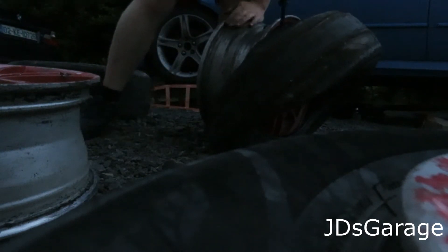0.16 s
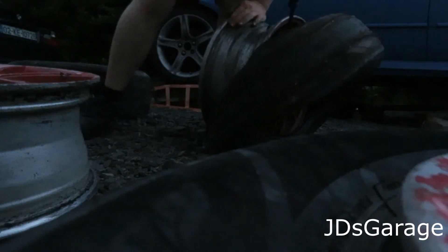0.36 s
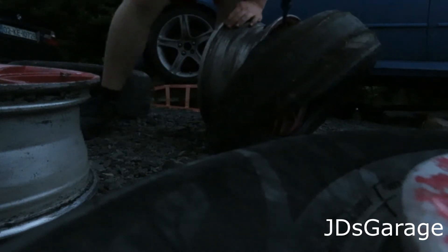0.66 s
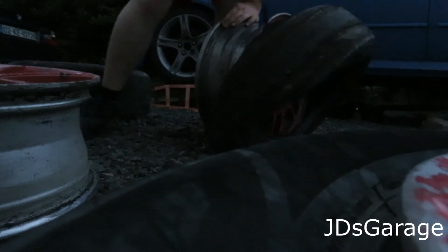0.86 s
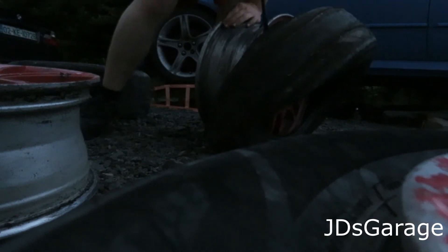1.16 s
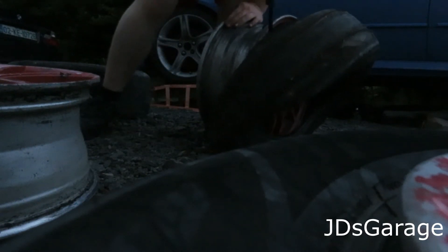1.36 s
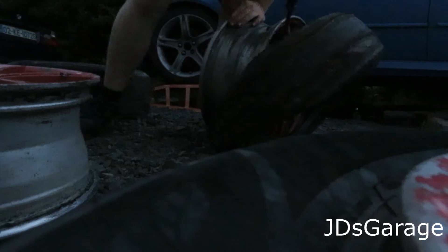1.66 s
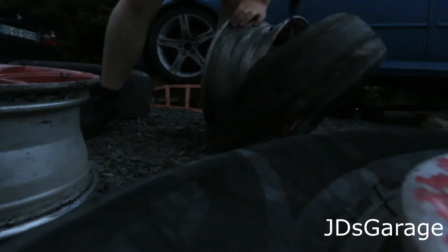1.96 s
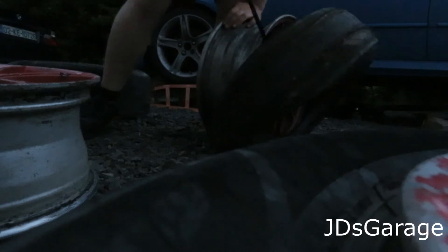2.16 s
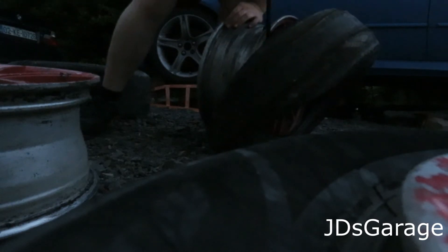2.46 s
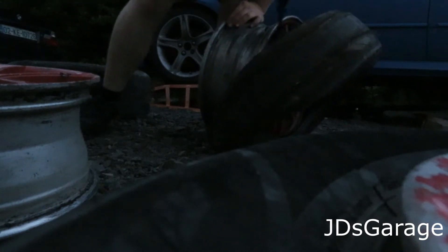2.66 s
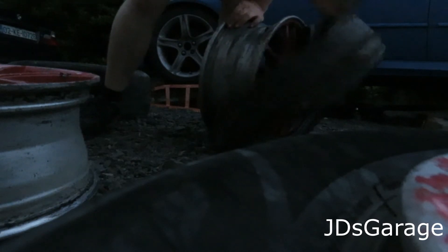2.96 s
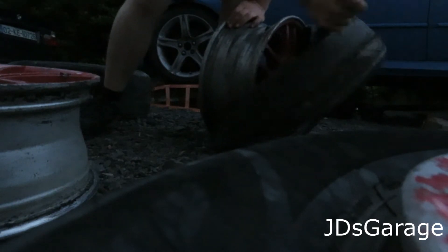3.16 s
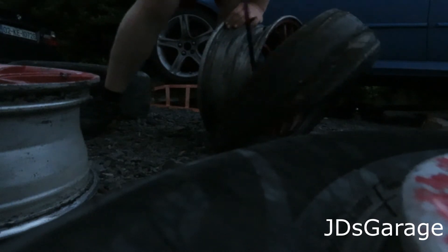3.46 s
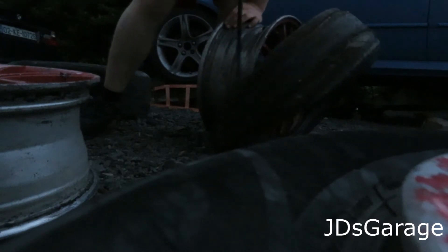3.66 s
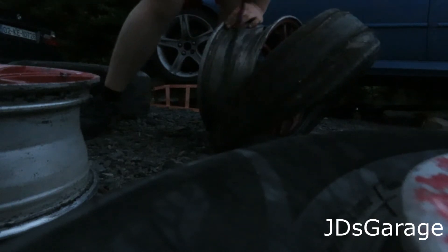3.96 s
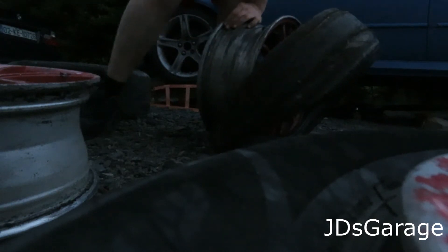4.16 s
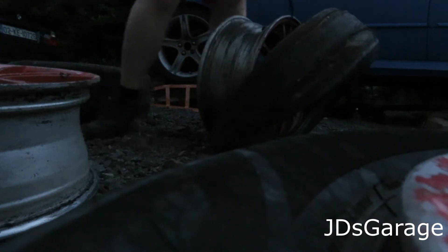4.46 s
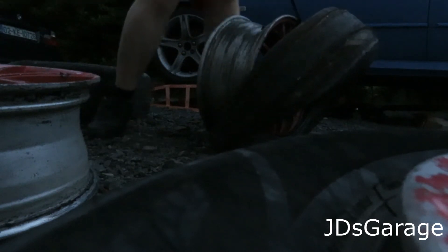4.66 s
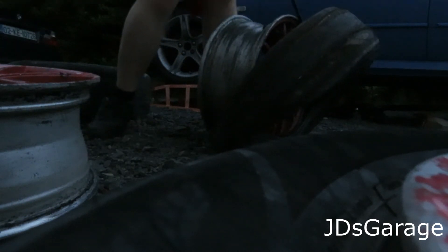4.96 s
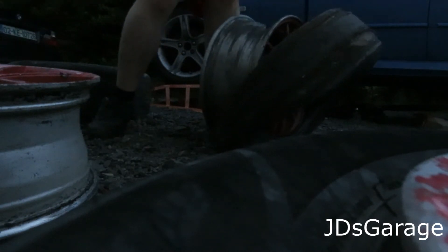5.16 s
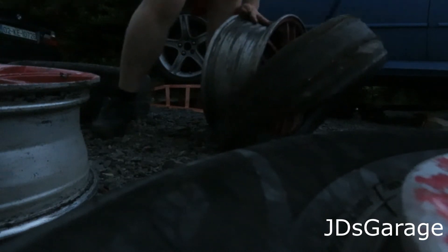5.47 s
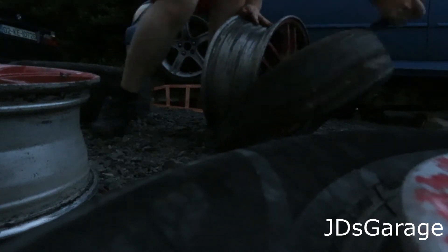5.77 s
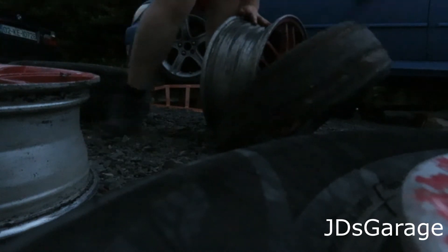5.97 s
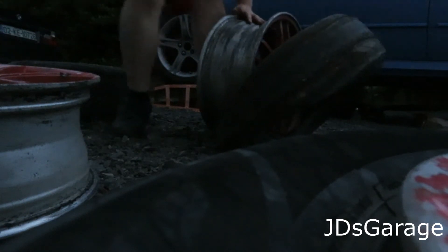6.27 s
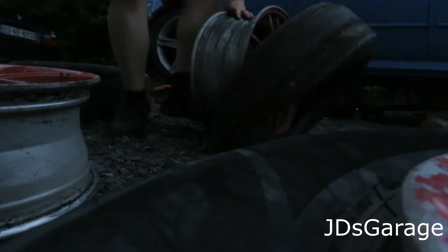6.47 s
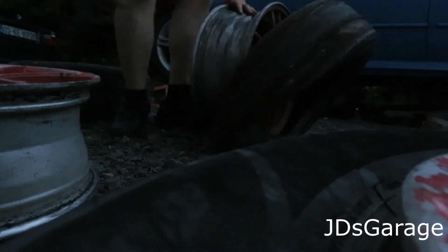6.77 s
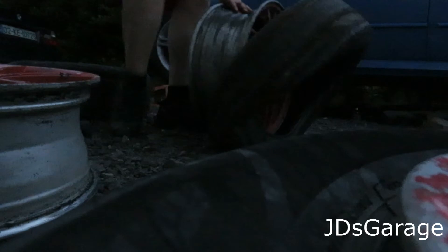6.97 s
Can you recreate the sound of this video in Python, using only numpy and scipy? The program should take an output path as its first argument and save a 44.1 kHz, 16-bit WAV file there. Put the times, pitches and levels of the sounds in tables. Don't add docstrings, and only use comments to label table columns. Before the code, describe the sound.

Irregular hard metal knocks and scrapes on a rim, damped by rubber, with creaking tyre, a few squeaks and shoes grinding gravel.

```python
import sys
import numpy as np
from scipy import signal
from scipy.fft import rfft, irfft
from scipy.io import wavfile
from scipy.ndimage import uniform_filter1d

SR = 44100
rng = np.random.default_rng(int(sys.argv[2]) if len(sys.argv) > 2 else 0)


def dump(signal):
    limited = np.clip(np.atleast_2d(signal).T, -1, 1)
    pcm = np.round(limited * 32767).astype(np.int16)
    wavfile.write(sys.argv[1], SR, pcm)


def natural_amplitude(level_db):
    exponent = np.asarray(level_db, float) / 20
    return 10 ** exponent


N = 313992


def rms_one(x):
    return x / np.sqrt(np.mean(x ** 2) + 1e-20)


def in_time(rows):
    s, *columns = np.transpose(rows)
    return [np.interp(np.arange(N) / SR, s, column) for column in columns]


def band(x, low_hz, high_hz):
    return signal.sosfilt(signal.butter(2, [low_hz, high_hz], "band", fs=SR, output="sos"), x)


def shaped(x, spectrum):
    hz, level_db = np.transpose(spectrum)
    bins_hz = np.fft.rfftfreq(N, 1 / SR) + 1
    gain_db = np.interp(np.log(bins_hz), np.log(hz + 1), level_db)
    return irfft(rfft(x) * natural_amplitude(gain_db), N)


def drift(rate_hz):
    knots_per_s = 60
    knots = rng.standard_normal(int(N / SR * knots_per_s) + 2)
    knots = uniform_filter1d(knots, max(1, round(knots_per_s / rate_hz)))
    return rms_one(np.interp(np.arange(N) / SR, np.arange(len(knots)) / knots_per_s, knots))


def grains(per_s, spread_db):
    sizes = natural_amplitude(spread_db * np.minimum(rng.exponential(1, N), 4)) * rng.choice([-1, 1], N)
    return sizes * (rng.random(N) < per_s / SR) + 1e-18


def body(clicks, modes, damping, low_db=0, wander_db=4.5):
    out = np.zeros(N)
    for hz, level_db, t60 in modes:
        r = natural_amplitude(-60 / (t60 * damping * SR))
        w = 2 * np.pi * hz / SR
        gain = natural_amplitude(level_db) * np.sqrt(1 - r * r) * np.sin(w)
        share = natural_amplitude(wander_db * drift(30) + low_db * (hz < 1500))
        out += signal.lfilter([0, gain], [1, -2 * r * np.cos(w), r * r], clicks * share)
    return out


def add(out, sound, s):
    at = round(s * SR)
    out[at:at + len(sound)] += sound[:N - at]


def strokes(tables):
    gate = np.zeros(N)
    for rows in tables:
        gate[round(rows[0][0] * SR):round(rows[-1][0] * SR)] = 1
    return uniform_filter1d(gate, size=200)


def swells(rows, rise_db, fall_db):
    t, gain, other = np.arange(N) / SR, np.full(N, 1e-9), np.zeros(N)
    for start_s, top_s, end_s, level_db, other_db in rows:
        span = slice(round(start_s * SR), round(end_s * SR))
        bend_db = np.interp(t[span], [start_s, top_s, end_s], [-rise_db, 0, -fall_db])
        shape = natural_amplitude(level_db + bend_db)
        gain[span] += shape
        other[span] += shape * other_db
    return uniform_filter1d(gain, size=80), uniform_filter1d(other / gain, size=200)


# (frequency [Hz], level [dB per Hz])
GRIT_SPECTRUM = [(1470, -30), (2500, 0.5), (2940, -5), (3330, -1), (6980, -10.5), (9740, -14), (13000, -24),
                 (15800, -42)]
# (time [s], level [dB])
LOAD = [(0.0, -61), (0.52, -44), (0.69, -60), (1.41, -59), (1.9, -39.5), (2.2, -41), (2.34, -50),
        (3.01, -44.5), (3.53, -48.5), (4.0, -66), (4.56, -45.5), (4.84, -54), (5.27, -42), (5.67, -52.5),
        (5.85, -52.5), (6.23, -50), (6.54, -43), (7.12, -49)]


def rustle():
    stones = grains(5000 * natural_amplitude(2.5 * drift(50)), spread_db=0.5)
    dull = natural_amplitude(-1.5) * rms_one(band(stones, 800, 3200))
    colours = dull + rms_one(shaped(stones, GRIT_SPECTRUM))
    return natural_amplitude(-45 + 0.27 * in_time(LOAD)[0]) * colours


# (frequency [Hz], level [dB])
AIR_SPECTRUM = [(12, -54.5), (20, -26.5), (126, -8.5), (221, 5.5), (284, -1), (444, 1), (525, -1.5),
                (621, -22), (755, -4), (2180, -12.5), (2580, -16.5), (3320, -20.5), (11700, -49),
                (13400, -51.5), (15800, -80.5)]


def ambience(work):
    knee_db, slope, recovery_db_per_s = -28, 0.27, 3.5
    level_db = 10 * np.log10(uniform_filter1d(work ** 2, size=256) + 1e-12)
    ramp = recovery_db_per_s * np.arange(N) / SR
    cut_db = np.maximum.accumulate(slope * np.maximum(level_db - knee_db, 0) + ramp) - ramp
    common, own = rng.standard_normal(N), rng.standard_normal((2, N))
    air = natural_amplitude(-53.5 + 1.5 + 2.0 * drift(4)) * rms_one(shaped(common + 0.15 * own, AIR_SPECTRUM))
    return natural_amplitude(-cut_db) * (air + rustle())


# (delay [s], level [dB])
ECHOES = [(.0011, -16), (.0017, -15.5), (.0062, -13.5), (.0091, -18),
          (.021, -20), (.028, -21), (.047, -26.5), (.056, -29)]


def yard(x):
    dull, out = signal.lfilter([.4], [1, -.6], x), np.zeros((2, N))
    for k, (lag_s, echo_db) in enumerate(ECHOES):
        add(out[k % 2], natural_amplitude(echo_db) * dull, lag_s)
    return out


# (start [s], hardest [s], end [s], crunch level [dB], fine grit against crunch [dB])
SCUFFS = [(4.22, 4.24, 4.31, -48, -19), (4.29, 4.364, 4.45, -46, -8), (4.465, 4.515, 4.65, -36.5, -13.5),
          (4.84, 4.89, 4.93, -46, -14), (4.92, 4.96, 5.04, -54, -3), (5.5, 5.598, 5.7, -41.5, -8),
          (5.8, 5.845, 5.89, -54, 0), (6.03, 6.065, 6.1, -42, -10), (6.06, 6.102, 6.15, -40, -11),
          (6.128, 6.144, 6.19, -38, -15), (6.15, 6.185, 6.26, -42, -13), (6.2, 6.27, 6.34, -54, -4),
          (6.65, 6.684, 6.76, -43, -13), (6.926, 6.938, 7.0, -34, -5.5), (7.002, 7.009, 7.04, -40, 4),
          (7.008, 7.02, 7.06, -40, 4), (7.025, 7.037, 7.07, -43, 2), (7.095, 7.101, 7.13, -39, -3),
          (7.105, 7.119, 7.13, -38, -4)]


def gravel():
    tread, grit_db = swells(SCUFFS, rise_db=15, fall_db=22)
    stones = grains(2200 * natural_amplitude(5 * drift(50)), spread_db=3.5)
    crunch = rms_one(band(band(stones, 290, 1900), 200, 2200))
    return tread * (crunch + natural_amplitude(grit_db + 4.5) * rms_one(shaped(stones, GRIT_SPECTRUM)))


# (time [s], pitch [Hz], level [dB])
SQUEAKS = [
    [(1.14, 1203, -61), (1.17, 1148, -49), (1.215, 1060, -63.5), (1.275, 919.4, -45), (1.305, 798, -45)],
    [(2.215, 930, -36), (2.26, 1016, -36), (2.285, 1250, -38), (2.31, 1420, -42), (2.335, 1443, -55)],
    [(6.73, 2753, -59), (6.76, 2700, -47), (6.83, 2600, -54), (6.92, 2424, -50), (6.93, 2400, -67)],
]


def squeaks():
    rough, width_hz = .03, 110
    hz, level_db = in_time(np.concatenate(SQUEAKS))
    turn = 2 * np.pi * np.cumsum(hz * (1 + rough * drift(30))) / SR
    grain = rms_one(signal.lfilter(*signal.butter(1, width_hz, fs=SR), rng.standard_normal((2, N))))
    tone = (0.49 + grain[0]) * np.sin(turn) + grain[1] * np.cos(turn)
    return strokes(SQUEAKS) * natural_amplitude(level_db - 2.5 + 3 * drift(60)) * tone


# (frequency [Hz], level [dB], decay t60 [s])
TYRE_MODES = [(151, -25.5, 0.08), (205, -2.5, 0.27), (242.6, 2, 0.24), (312, -10, 0.2), (385.2, 3, 0.059),
              (433, -2, 0.087), (493.5, -3, 0.16), (697, -10.5, 0.065)]
# (start [s], hardest [s], end [s], creak level [dB], rumble against creak [dB])
HEAVES = [
    (2.25, 2.29, 2.32, -26, -30),
    (2.54, 2.56, 2.6, -30, -20),
    (2.59, 2.62, 2.69, -32, -20),
    (3.0, 3.06, 3.1, -30, -12),
    (4.66, 4.74, 4.78, -33, -30),
    (3.55, 3.571, 3.63, -23, -20),
    (5.125, 5.135, 5.2, -29.5, -33.5),
    (5.44, 5.6, 5.64, -28, -19),
    (5.5, 5.576, 6, -57, -2),
]
# (time [s], peak level [dB], pitch [Hz])
TREAD_BLOWS = [(0.562, 0, 215), (1.311, -23.5, 196), (1.359, -21.5, 200.8), (1.726, -24.5, 223),
               (1.767, -24, 236.2), (1.877, -22, 239), (2.392, -26, 184), (2.531, -15, 192.3),
               (2.628, -17, 197.4), (1.385, -31, 200), (1.668, -33, 230), (2.003, -30, 250),
               (2.562, -34, 210), (3.842, -26, 210), (4.604, -31, 220), (4.884, -41, 210),
               (6.319, -33, 210), (7.098, -32, 210), (2.602, -24, 200), (2.662, -32, 200),
               (2.776, -32, 210), (2.862, -36, 245), (2.91, -33, 207), (3.031, -25, 170), (5.324, -30, 250),
               (5.373, -28, 213), (5.468, -21, 240), (5.505, -24, 240), (5.53, -25, 220), (5.548, -23, 210),
               (5.563, -20, 210), (5.588, -24, 220), (5.608, -26, 210), (5.808, -32, 242),
               (5.845, -34, 230), (3.057, -14.5, 196), (3.112, -18.5, 191.5), (4.229, -32.5, 229.6),
               (5.201, -11, 245), (5.444, -22, 235), (6.062, -29, 198.3), (0.996, -37, 210),
               (6.976, -22, 163.5), (7.013, -23.5, 220)]
# (time [s], peak level [dB], pitch [Hz])
WALL_BLOWS = [(0.996, -35, 407), (2.198, -18, 470), (2.344, -30.5, 451), (3.308, -28.5, 468),
              (3.541, -14.5, 465.5), (3.841, -23.5, 506), (4.496, -27.5, 461), (4.601, -26, 453),
              (4.641, -22, 393), (5.129, -18.5, 426), (1.16, -39, 480), (1.182, -39, 490),
              (1.823, -30, 495), (2.075, -28, 404), (2.394, -32, 430), (2.533, -16, 470), (2.56, -33, 520),
              (3.575, -21, 450), (3.655, -32, 480), (3.685, -33, 480), (5.088, -31, 430), (5.15, -25, 420),
              (4.884, -34, 400), (2.776, -36, 430), (3.06, -22, 400), (5.203, -13, 510), (5.203, -20, 377),
              (5.47, -26, 500), (5.505, -28, 480), (5.692, -30, 450), (6.133, -29, 433), (6.143, -30, 520),
              (5.71, -24.5, 490), (5.76, -38, 477), (6.318, -27, 370), (6.672, -29, 422),
              (6.93, -19.5, 309)]


def carcass():
    load_db = in_time(LOAD)[0]
    wrench, rumble_db = swells(HEAVES, rise_db=1.5, fall_db=11)
    force = natural_amplitude(load_db - 5) + wrench * natural_amplitude(-12.5)
    slips = rms_one(grains(1000 * natural_amplitude(3 * drift(30)), spread_db=2.5)) * force
    for s, peak_db, hz in TREAD_BLOWS + WALL_BLOWS:
        slips[round(s * SR)] += natural_amplitude(peak_db + 4)
    rumble_gain = wrench * natural_amplitude(rumble_db - 4) + natural_amplitude(-46.5 + .35 * load_db + 3 * drift(5))
    rumble = rumble_gain * rms_one(band(rng.standard_normal(N), 29, 100))
    return band(body(slips, TYRE_MODES, damping=0.76), 140, 700) + rumble


# (time [s], level [dB])
DROPS = [
    (3.056, -32),
    (3.541, -38.5),
    (5.445, -32),
    (6.929, -44),
    (6.976, -44),
    (7.013, -37.5),
]


def thuds():
    out, t = np.zeros(N), np.arange(round(.3 * SR)) / SR
    swell = 1 - np.exp(-t / 0.0046)
    push = np.sin(2 * np.pi * 75 * t) * natural_amplitude(2.5 - 60 * t / 0.21) * swell
    for s, peak_db, hz in TREAD_BLOWS + WALL_BLOWS:
        pair = np.sin(2 * np.pi * hz * t) + .35 * np.sin(2 * np.pi * 1.18 * hz * t)
        add(out, natural_amplitude(-52 + 0.1 * peak_db) * push, s)
        add(out, natural_amplitude(peak_db + 1.0) * pair * natural_amplitude(-60 * t / 0.083) * swell, s)
    for s, drop_db in DROPS:
        add(out, natural_amplitude(drop_db) * push, s)
    return out


# (time [s], frequency [Hz], level [dB], decay t60 [s])
FREE_RINGS = [(.56, 1685, -8.5, 0.1), (.562, 1217, -24, 0.16), (.56, 1175, -12, 0.05),
              (.5575, 3200, 3, .035), (.558, 2530, -10, .04), (.997, 2076, -23, 0.044),
              (1.313, 2070, -20, 0.06), (1.356, 1705, -26, 0.09), (2.2, 965, -23, 0.12),
              (2.202, 790, -21, .12), (2.203, 1650, -22, .12), (2.532, 1700, -19, .08),
              (2.532, 2500, -20, .07), (2.533, 3700, -32, .14), (2.622, 1910, -30, .07),
              (3.842, 791, -19, .07), (3.842, 3316, -18, .12), (4.642, 790, -27, .09),
              (5.203, 1330, -17, .06), (5.203, 797, -17, .06), (2.625, 3680, -33, .06),
              (2.638, 1600, -28, .07), (5.204, 2050, -21, .12), (7.099, 2100, -25, .06),
              (2.2, 2070, -15, 0.085), (2.532, 2070, -14.5, 0.058), (2.63, 1653, -23.5, 0.045),
              (3.543, 3680, -22, 0.2), (3.543, 2690, -12, 0.054), (3.605, 2033, -17, 0.11),
              (3.842, 2062, -20, 0.1), (3.842, 1305, -19, .1), (3.842, 4990, -11, .06),
              (4.606, 2075, -7, 0.16), (4.64, 2070, -18, 0.1), (4.605, 3656, -18, 0.083),
              (5.203, 1800, -12, .085), (6.32, 2550, -16, 0.082), (6.32, 1900, -17, 0.045),
              (6.325, 1234, -33.5, 0.28), (6.933, 3200, -29.5, 0.12), (7.1, 3000, -28, 0.066),
              (4.72, 2075, -30, 0.2), (1.375, 1760, -29, .06), (1.36, 1200, -31, .09),
              (1.357, 3750, -34, .09), (1.32, 2600, -32, .06), (5.15, 2070, -24, .1)]
# (time [s], frequency [Hz], level [dB])
PINGS = [(.892, 1690, -42), (1.22, 2700, -47), (2.252, 1000, -22), (2.272, 1150, -27), (2.275, 1400, -27),
         (2.297, 1410, -30), (2.345, 1410, -42), (2.391, 1450, -38), (2.428, 1460, -41), (2.985, 2500, -40),
         (3.05, 1680, -35), (3.04, 3900, -38), (3.058, 3680, -34), (3.06, 2500, -35), (3.082, 2600, -36),
         (3.108, 2650, -38), (5.128, 1820, -23), (5.13, 2520, -29), (5.136, 791, -27), (5.142, 2300, -27),
         (5.158, 791, -28), (5.16, 2520, -29), (5.135, 4970, -33), (5.14, 4050, -33), (5.16, 3700, -33),
         (5.405, 2680, -39), (5.418, 3700, -43), (5.485, 3560, -39), (5.492, 2080, -37), (5.515, 2080, -37),
         (5.545, 1680, -37), (5.555, 2090, -35), (5.57, 1680, -34), (5.572, 3750, -40), (5.59, 2080, -36),
         (5.592, 1680, -36), (5.61, 2550, -41), (5.712, 2040, -36), (5.752, 3700, -44), (5.785, 1800, -44),
         (5.84, 2620, -43), (5.838, 2050, -44)]


def rings():
    out, t = np.zeros(N), np.arange(round(.3 * SR)) / SR
    ping_t60_s = .07
    for s, hz, level_db, t60 in FREE_RINGS + [(*row, ping_t60_s) for row in PINGS]:
        detune, phase = rng.standard_normal((2, 3, 1))
        neighbours = np.sin(2 * np.pi * hz * (1 + .035 * detune) * t + phase).sum(axis=0)
        tone = np.sin(2 * np.pi * hz * t) + 0.46 * natural_amplitude(-400 * t) * neighbours
        add(out, natural_amplitude(level_db + 2.0 - 68 * t / t60) * tone * (1 - np.exp(-t / .003)), s)
    return out


# (frequency [Hz], level [dB], decay t60 [s])
RIM_MODES = [(780.4, -3.5, 0.057), (965, -5, 0.095), (1217, -7.5, 0.097), (1360, -3, 0.085),
             (1500, -10.5, 0.078), (1685, -4, 0.055), (1843, -9.5, 0.092), (2006, -5.5, 0.044),
             (2070, -8, 0.11), (2533, -9.5, 0.11), (2608, -5, 0.058), (2690, -15.5, 0.12),
             (2830, -28.5, .08), (3155, -14.5, 0.14), (3303, -12.5, .12), (3440, -19, .1),
             (3680, -11.5, .1), (3750, -16.5, 0.088), (4027, -12, 0.16), (4313, -16.5, 0.12),
             (4640, -14, 0.11), (4850, -18.5, .12), (4970, -15.5, 0.17), (5490, -19.5, 0.15),
             (6050, -20.5, 0.084), (5920, -24, 0.21), (6770, -26, 0.16), (7670, -26.5, 0.15),
             (7700, -33.5, .06), (8750, -31.5, .05)]
# (start [s], hardest [s], end [s], level [dB], low modes [dB])
SLIDES = [(.544, .556, .56, -30.5, 0), (.88, .892, 0.945, -46, 1.5), (.94, .956, .99, -45.5, -7.5),
          (1.15, 1.29, 1.31, -51, 3), (2.205, 2.25, 2.32, -36, 0), (2.497, 2.51, 2.6, -40, -2),
          (2.55, 2.632, 2.68, -38, -13), (2.7, 2.76, 2.85, -51, -14), (2.79, 2.9, 3.0, -54, -14),
          (.66, .74, .82, -55, -3), (3.022, 3.062, 3.11, -35, -16), (3.07, 3.112, 3.15, -38, -6),
          (3.185, 3.22, 3.434, -42, -6), (3.34, 3.37, 3.47, -51.5, -7), (3.47, 3.53, 3.545, -41.5, -12.5),
          (3.55, 3.59, 3.64, -31, 0), (3.61, 3.68, 3.75, -36, -2), (4.63, 4.675, 4.765, -34, -3),
          (4.7, 4.752, 4.78, -35.5, 1), (4.83, 4.836, 4.87, -47, -8), (4.93, 4.96, 5.0, -50, -10),
          (1.21, 1.23, 1.28, -50, -8), (5.06, 5.1, 5.13, -35.5, -4), (5.105, 5.14, 5.21, -26, -12),
          (5.22, 5.236, 5.29, -44, -5), (5.37, 5.414, 5.45, -45, 0), (5.43, 5.58, 5.68, -39.5, -11),
          (5.7, 5.716, 5.74, -44.5, 0), (5.77, 5.84, 5.88, -55, -10), (6.94, 6.99, 7.09, -41.5, -2)]


def slides():
    press, low_db = swells(SLIDES, rise_db=10, fall_db=17)
    slips = rms_one(grains(2500 * natural_amplitude(3.5 * drift(60)), spread_db=2)) * press
    ringing = body(slips, RIM_MODES, damping=0.65, low_db=np.minimum(low_db + 3, 0))
    rasp = band(band(slips, 550, 5200), 550, 5200)
    hiss = band(slips, 3900, 11000)
    return natural_amplitude(-2.0) * band(ringing, 910, 5060) + natural_amplitude(-4.5) * rasp + natural_amplitude(-20) * hiss


# (time [s], peak level [dB], low modes [dB], high modes [dB])
CLANKS = [(0.558, 4, -22, -13), (0.997, -25, -4, -23), (1.312, -18, -4, -28), (1.354, -20.5, -8, -22),
          (1.374, -33, -6, -22), (2.2, -7, -4.5, -17), (2.532, -17, -7, -22), (2.624, -24, -8, -14),
          (3.543, -1.5, -11, -16), (3.575, -7, -9, -12.5), (3.604, -13, -11, -24), (3.624, -19.5, -9, -26),
          (3.676, -25.5, -8.5, -24.5), (3.842, 0.5, -14.5, -13.5), (4.603, -5, -9, -20),
          (4.642, -20, -4, -24.5), (5.203, -18.5, 6.5, -17), (6.319, -13, -9, -19), (6.344, -25, -12, -24),
          (6.417, -33, -1.5, -29.5), (6.931, -23, -7, -14), (6.972, -28, -15, -20),
          (7.027, -22.5, -29, -11), (7.099, -17, -23.5, -19)]
# (time [s], peak level [dB])
TICKS = [
    (2.984, -34),
    (3.346, -28.5),
    (3.389, -33.5),
    (3.43, -34),
    (3.495, -35),
    (5.598, -34),
    (6.808, -43),
    (6.823, -48),
    (6.868, -45),
]
# (time [s], peak level [dB])
KNOCKS = [
    (2.342, -44),
    (2.392, -44.5),
    (4.245, -46),
    (4.884, -41),
    (6.133, -41),
]
# (low edge [Hz], high edge [Hz], level [dB], decay t60 [s])
CRACK_BANDS = [(469, 1910, -0.5, 0.053), (1480, 3980, 3, 0.026), (4000, 8000, -16, .035),
               (8200, 22000, -21, 0.021)]


def clanks():
    out, t = np.zeros(N), np.arange(round(.28 * SR)) / SR
    hz, level_db, t60 = np.transpose(RIM_MODES)[:, :, None]
    motion = np.exp((2j * np.pi * hz - 3 * np.log(10) / (t60 * 0.66)) * t)
    ticks = [(*row, -13.5, -17) for row in TICKS]
    knocks = [(*row, 7.5, -29) for row in KNOCKS]
    blows = sorted(CLANKS + ticks + knocks)
    chance = rng.standard_normal((len(blows), 2, len(RIM_MODES), 1))
    for (s, peak_db, low_db, high_db), (share, phase) in zip(blows, chance):
        place_db = (low_db + 5) * (hz < 1750) + (high_db + 9) * (hz > 3900)
        strength = natural_amplitude(level_db + place_db + 3.5 * share) * np.exp(3j * phase)
        ringing = np.imag(strength[:, 0] @ motion)
        white = rng.standard_normal(len(t))
        tilts_db = low_db + 5, 0, 1.8 * (high_db + 12), 2.4 * (high_db + 13)
        crack = np.zeros(len(t))
        for (low_hz, high_hz, crack_db, fade_s), tilt_db in zip(CRACK_BANDS, tilts_db):
            decay = natural_amplitude(-60 * t / fade_s) + natural_amplitude(-27 - 60 * t / (6.1 * fade_s))
            crack += natural_amplitude(crack_db + tilt_db) * decay * rms_one(band(white, low_hz, high_hz))
        blow = natural_amplitude(peak_db) * (natural_amplitude(-6.5) * ringing + natural_amplitude(-6) * crack) * (1 - np.exp(-t / 0.001))
        top_hz = min(17000 * natural_amplitude(0.81 * (high_db + 11.5)), .45 * SR)
        add(out, signal.lfilter(*signal.butter(2, top_hz, fs=SR), blow), s)
    return out


def scene():
    work = gravel() + squeaks() + carcass() + thuds() + rings() + slides() + clanks()
    return ambience(work) + natural_amplitude(-7.5) * yard(work) + work


def low_pass(x):
    return signal.sosfilt(signal.butter(12, 15850, fs=SR, output="sos"), x)


# (frequency [Hz], side minus mid [dB])
PORTS = [(60, -16.5), (110, -13.5), (200, -12.5), (380, -8), (700, -17), (1290, -15.5), (2380, -11.5),
         (4400, -7), (8120, -5.5), (15000, -8)]


def record(dry):
    hz = np.fft.rfftfreq(N, 1 / SR)
    mid = dry.mean(axis=0)
    swing = -1j * np.cos(2 * np.pi * hz * 0.00013)
    side = irfft(swing * rfft(shaped(mid, PORTS)), N)
    side -= .2 * signal.lfilter(*signal.butter(2, 7000, "high", fs=SR), mid)
    ports = np.clip(dry + side * [[1], [-1]], -.98, .98)
    mix = signal.lfilter(*signal.butter(1, 25, "high", fs=SR), ports)
    return low_pass(mix)


dry = scene()
out = record(dry)
dump(out)
```